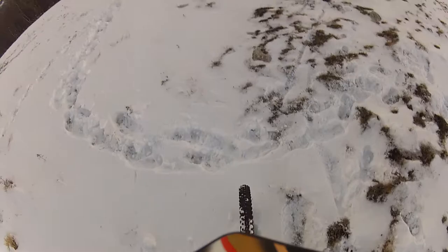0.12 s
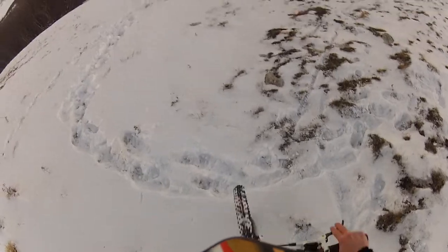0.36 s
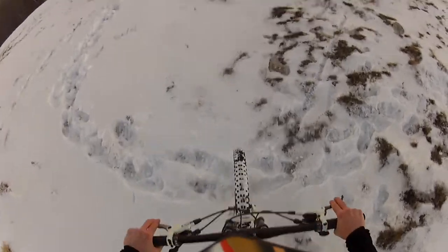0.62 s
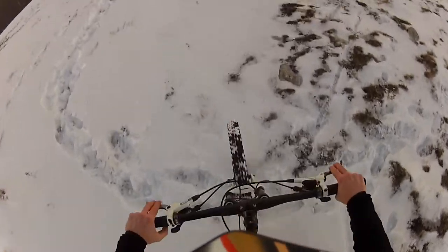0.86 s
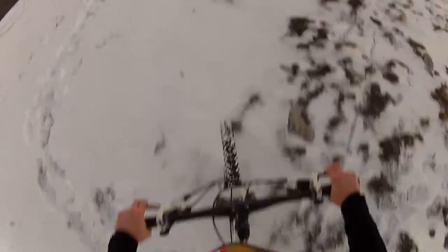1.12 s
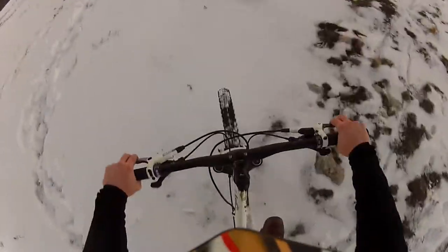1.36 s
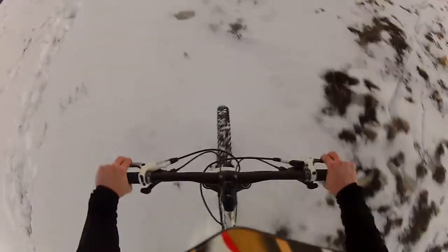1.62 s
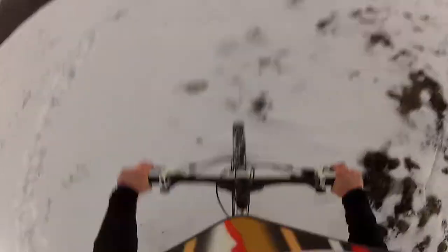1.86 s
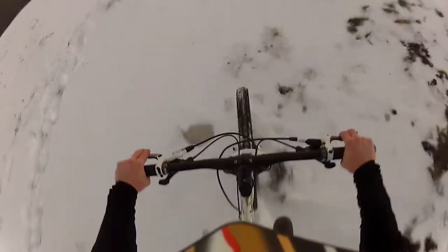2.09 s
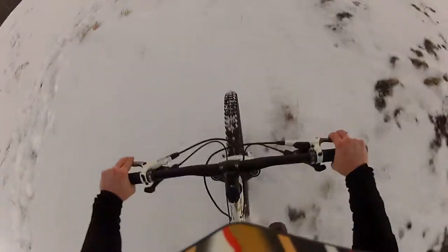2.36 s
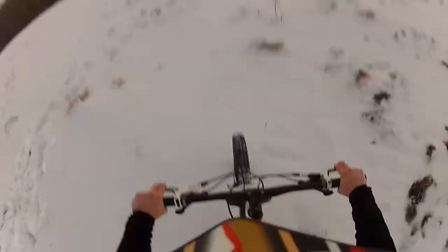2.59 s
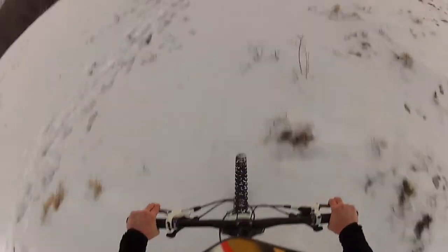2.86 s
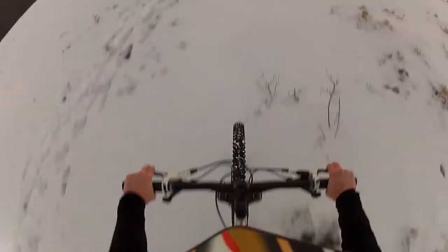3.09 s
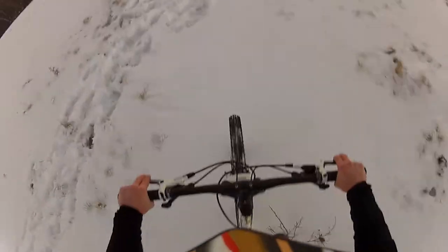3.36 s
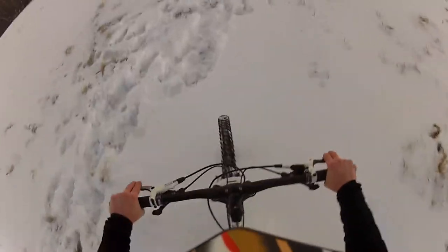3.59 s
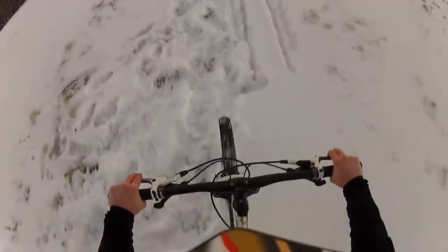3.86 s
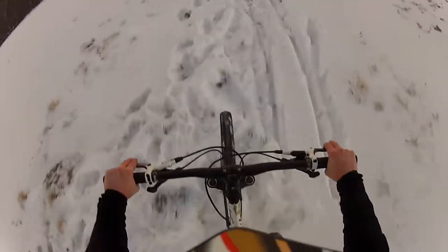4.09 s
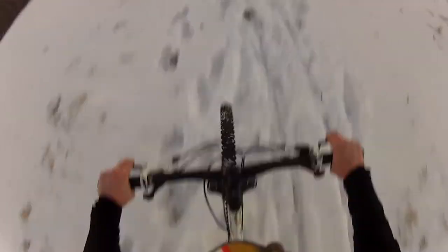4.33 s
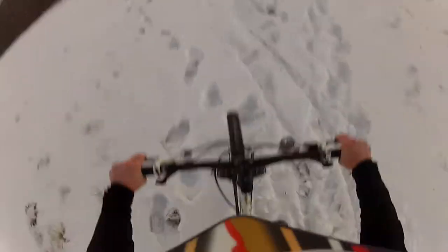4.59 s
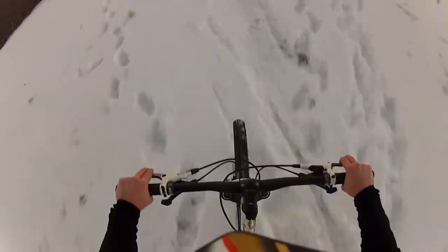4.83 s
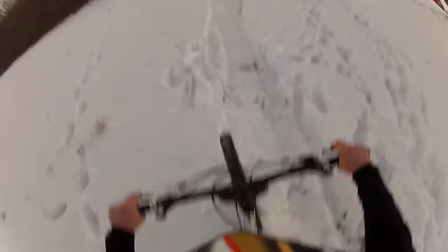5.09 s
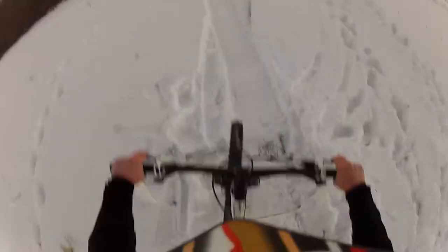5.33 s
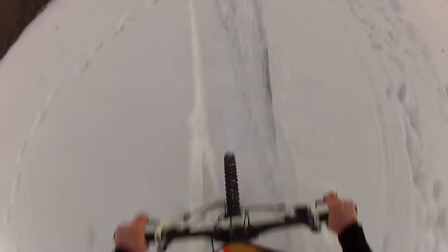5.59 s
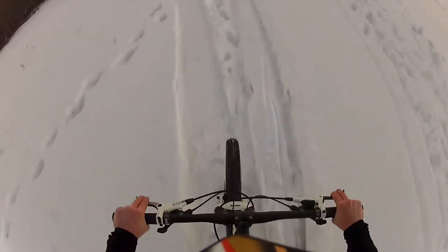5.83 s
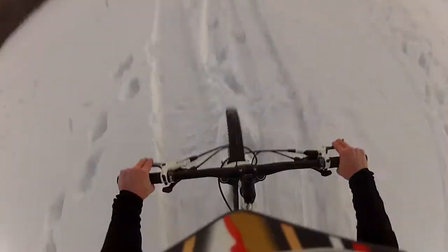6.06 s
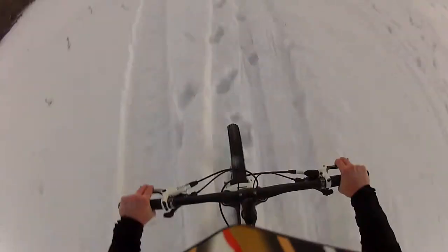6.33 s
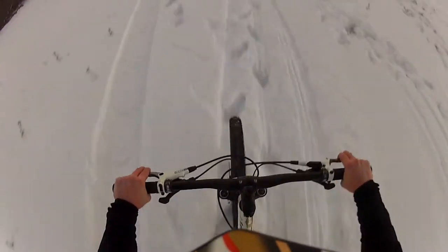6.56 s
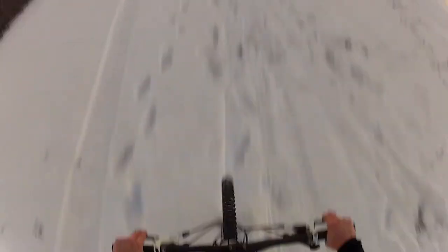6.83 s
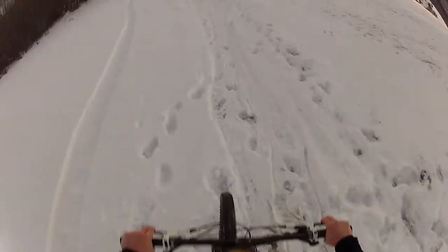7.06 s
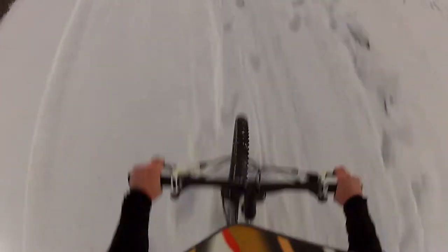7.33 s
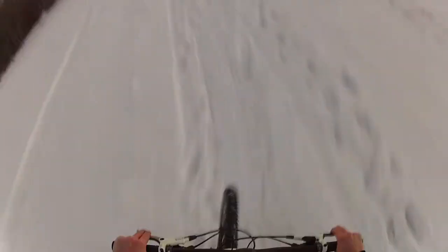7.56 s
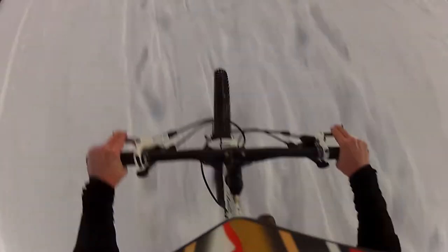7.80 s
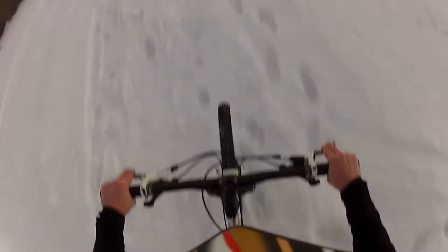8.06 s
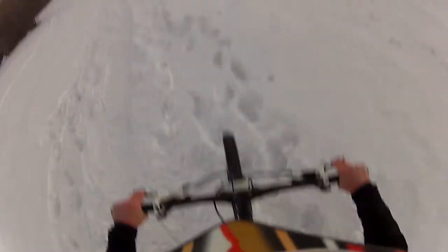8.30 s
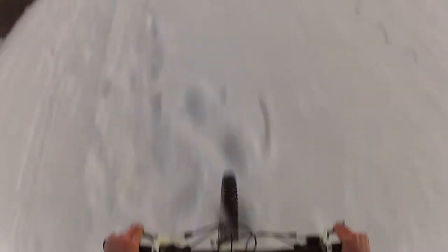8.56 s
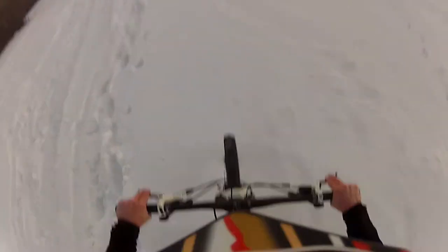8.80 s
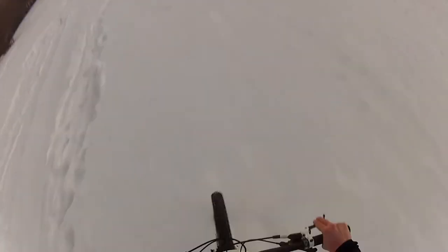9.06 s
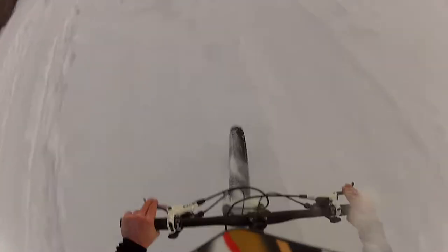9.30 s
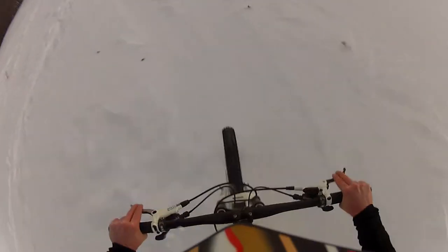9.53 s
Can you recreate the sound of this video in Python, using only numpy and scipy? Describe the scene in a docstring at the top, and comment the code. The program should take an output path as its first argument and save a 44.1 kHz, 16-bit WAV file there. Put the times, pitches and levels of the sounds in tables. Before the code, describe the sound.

A bike and its cased camera jolt down a bumpy snow slope, faint taps and hiss growing into hard plastic knocks and low thumps.

```python
"""Faint hiss, buzzing and a dull tap come first; then ever stronger knocks and thumps join in.
A small camera in a hard plastic case rides on a cyclist jolting down a bumpy snow slope.
Blows make the case, panels, clip and latch ring at their own tones; each jolt swings the diaphragm.
Shaped noise makes the low rumble, tyre hiss and snow scuff beneath; tiny touches make a fine rattle.
The camera holds each sample a twelve-thousandth of a second, which mirrors the sound into the treble."""
import sys
import numpy as np
from scipy import signal
from scipy.fft import rfft, irfft
from scipy.io import wavfile
from scipy.ndimage import uniform_filter1d

SR = 44100
rng = np.random.default_rng(int(sys.argv[2]) if len(sys.argv) > 2 else 0)


def to_linear_factor(level_db):
    """Convert decibel levels (scalar or array-like) to linear amplitude factors."""
    exponent = np.asarray(level_db, float) / 20
    return 10 ** exponent


def unload_audio(sound):
    """Save the sound as a 16-bit wav file, at the path given as the first command line argument."""
    columns = np.transpose(np.atleast_2d(sound))
    # keep every value between -1 and 1, then stretch to whole-number steps
    steps = np.round(np.clip(columns, -1, 1) * 32767)
    wavfile.write(sys.argv[1], SR, steps.astype(np.int16))


N = 426447
T = np.arange(N) / SR  # time of every sample [s]

# Event levels are peaks before soft clipping.
# the camera hits its case: (time [s], peak [dB])
CASE_KNOCKS = [(1.21, -19), (1.236, -36), (1.275, -27), (1.532, -29), (1.799, -31), (1.812, -26),
               (1.836, -23.5), (1.869, -15), (1.951, -33), (2.289, -36), (2.531, -15), (2.538, -18),
               (2.98, -26.5), (3.005, -24), (3.044, -8.5), (3.21, 4.5), (3.849, -24.5), (4.246, -18.5),
               (4.259, -3.5), (4.441, -29.5), (4.449, -23), (4.483, -34), (4.462, -24), (4.473, -22),
               (4.497, -13), (4.51, 9.5), (4.664, -23.5), (4.766, -23), (5.009, -19), (5.029, -24),
               (5.176, -10.5), (5.187, -10.5), (5.404, -19.5), (5.46, -21.5), (5.738, -16), (5.948, -30.5),
               (6.264, 1), (7.101, -31), (6.905, 0), (7.173, -23.5), (7.238, 7), (7.293, -21),
               (7.305, -9.5), (7.447, 2.5), (7.633, 5), (7.478, -34), (7.687, -20.5), (7.711, -26),
               (7.748, 2), (7.825, -16), (8.029, -26), (8.093, -16.5), (8.316, -7.5), (8.378, -23),
               (8.491, 1.5), (8.643, 2), (8.783, -14), (8.869, -25), (9.127, -27), (9.193, -8.5),
               (9.294, -26), (9.423, -25)]
# (time [s], blow peak [dB], tick lead [s], tick peak [dB], thump peak [dB])
SEAT_DROPS = [(1.265, -21, .013, -18, -19), (1.585, -26.5, 0.02, -30.5, -26.5),
              (1.921, -11.5, 0.012, -45, -16), (2.023, -28.5, 0.01, -42, -18.5),
              (2.325, -25.5, .013, -23.5, -22.5), (2.651, -13.5, 0.013, -36, -19.5),
              (3.027, -21.5, .013, -13.5, -17), (3.266, -17, 0.014, -10, -15),
              (4.304, -12.5, .01, -9.5, -23.5), (4.549, -12, 0.016, -35, -18.5),
              (5.074, -16, 0.013, -21.5, -15.5), (5.531, -30, .031, -25, -38),
              (5.756, -21.5, 0.029, -23.5, -22), (6.112, -8, 0.012, -10, -13.5),
              (6.335, -12.5, 0.018, -25.5, -17.5), (6.773, -22, 0.029, -28, -25),
              (6.972, -16, .013, -40, -23), (7.283, -13, 0.01, -37, -9), (7.53, -8.5, .013, -38, -6),
              (7.678, -23, .013, -28, -11.5), (7.812, -10, .013, -41, -10),
              (8.085, -10.5, .014, -15, -18.5), (8.368, -10.5, .014, -15, -16),
              (8.543, -9.5, 0.0069, -12.5, -11), (8.695, -4, .018, -22, -13),
              (8.859, -10, 0.024, -26, -17.5), (9.181, -14.5, 0.012, -13, -9.5),
              (9.324, -14, .023, -18, -20)]
# duller blows on a panel: (time [s], peak [dB], panel tone [Hz])
PANEL_TAPS = [(0.364, -24.5, 1127), (0.53, -39, 1150), (0.683, -40, 1050), (0.767, -35, 940),
              (0.974, -25, 1110), (1.184, -21.5, 726), (1.198, -22, 900), (1.45, -31.5, 1100),
              (1.512, -26.5, 840), (1.728, -22.5, 1075), (2.068, -24.5, 1080), (2.483, -30.5, 1070),
              (2.775, -20, 1054), (3.169, -29.5, 1130), (3.772, -26.5, 895), (3.839, -25, 840),
              (4.076, -33, 1020), (4.377, -27, 1160), (4.619, -24, 920), (4.709, -19, 1070),
              (4.787, -24.5, 1070), (4.923, -27.5, 790), (4.978, -28, 1040), (5.105, -23, 1070),
              (5.652, -24.5, 1040), (5.786, -30.5, 1070), (6.027, -24, 915), (6.219, -20, 1040),
              (6.383, -29, 830), (6.474, -18, 1065), (6.665, -29.5, 1000), (7.544, -16, 1070),
              (7.925, -24, 894), (8.556, -20, 890)]
# further clip ticks: (time [s], peak [dB])
CLIP_TICKS = [(4.517, -7), (4.473, -17.5), (7.151, -27), (7.28, -12.5), (7.665, -25), (7.83, -22.5),
              (9.531, -20.5)]
# a loose latch buzzes: (time [s], peak [dB])
LATCH_BUZZES = [(0.069, -54), (0.401, -45.5), (0.455, -54), (0.482, -52), (0.76, -48), (1.21, -29.5),
                (1.265, -39), (1.53, -40.5), (1.582, -37), (1.778, -37.5), (1.868, -35), (1.915, -33.5),
                (2.122, -37.5), (2.225, -42), (2.256, -37.5), (2.336, -37), (2.53, -30.5), (2.618, -39.5),
                (2.643, -34.5), (2.885, -41.5), (2.985, -34), (3.359, -34.5), (3.798, -41.5), (3.84, -33.5),
                (4.247, -31), (4.275, -37), (4.497, -38), (4.652, -35.5), (4.822, -40), (4.859, -34),
                (5.01, -26.5), (5.141, -31), (5.459, -32), (5.477, -37), (5.521, -43), (5.695, -40),
                (5.713, -37), (5.738, -42), (5.861, -42), (6.03, -32.5), (6.33, -38), (6.506, -43),
                (6.709, -30.5), (6.774, -43), (7.094, -33), (7.167, -35.5), (7.612, -38), (7.68, -36),
                (7.775, -38), (8.035, -26.5), (8.171, -38.5), (8.313, -29), (8.777, -28.5), (9.017, -35.5),
                (9.127, -30), (9.141, -27.5), (9.266, -31), (9.318, -39), (9.477, -41), (9.538, -41),
                (9.574, -43)]
# further jolts swing the diaphragm out and back: (time [s], peak [dB], swing pace [Hz])
JOLT_SWINGS = [(0.49, -32, 30), (0.553, -32.5, 28.3), (0.796, -25, 35.8), (1.247, -26, 83),
               (1.828, -18.5, 24.1), (1.868, -12.5, 110), (1.899, -28, 63), (2.16, -25, 48.4),
               (2.531, -20, 102), (2.561, -23.5, 45.2), (2.981, -23, 87), (3.384, -26, 27.3),
               (3.869, -15, 45), (4.255, -11, 100), (4.484, -10, 41), (4.566, -12, 130),
               (4.68, -17.5, 33.2), (4.878, -30, 45), (4.958, -25, 45), (5.026, -18.5, 97),
               (5.053, -22, 52), (5.128, -16, 91), (5.159, -20, 29), (5.202, -15.5, 45),
               (5.424, -13.5, 43.4), (5.56, -30, 40), (5.697, -20.5, 89), (6.032, -16, 105),
               (6.207, -22, 38), (6.708, -21.5, 78.4), (7.535, -11.5, 81), (8.062, -15.5, 86),
               (9.048, -26.5, 35), (9.137, -20, 60), (9.163, -19, 105), (9.265, -14, 105), (9.443, -17, 47),
               (9.502, -15, 111)]
# swings after a hard knock: (delay [s], level against the knock's thump [dB], swing pace [Hz])
KNOCK_SWINGS = [(.004, -2, 64.6), (.03, -2.5, 70)]

# Ringing tones of each part; every blow varies their pitch and level a little.
# the case walls: (tone [Hz], time to fade by 60 dB [s], relative level [dB])
CASE_TONES = [(284, 0.031, -5), (726, 0.014, 3.5), (1482, 0.06, 0), (1711, 0.056, -0.5),
              (2224, 0.026, -6.5), (3408, 0.064, -7), (3785, 0.0072, -4.5), (4775, 0.02, -14.5)]
CLIP_TONES = [(3060, 0.016, -11.5), (1760, 0.0037, -6), (4280, 0.0028, -6.5)]
# the latch: (tone [Hz], time to fade by 60 dB [s], relative level [dB])
LATCH_TONES = [(5040, 0.0013, -3), (5140, 0.0083, 16.5), (2520, 0.0088, 11.5)]

# base level of the tyres between the bumps; the layers build on it: (time [s], level [dB])
TYRE_LEVEL = [(0.0, -65.5), (1.78, -60), (1.94, -52), (2.48, -57.5), (3.2, -54.5), (4.12, -60), (4.47, -52),
              (5.84, -53.5), (6.22, -52), (6.49, -56), (7.59, -49.5), (8.11, -48.5), (8.7, -50),
              (8.92, -50.5), (9.4, -46), (9.67, -54.5)]
# tone colour of the low rumble: (frequency [Hz], relative level [dB per Hz])
RUMBLE_COLOUR = [(15, 3.5), (35, 6.5), (60, -7), (100, -15), (240, -25.5), (450, -58.5)]
# tone colour of the gritty tyre hiss: (frequency [Hz], relative level [dB per Hz])
HISS_COLOUR = [(120, -3.5), (260, 11.5), (450, -3), (700, 3.5), (2300, -2.5), (3200, -13.5), (4200, -30),
               (5200, -14.5), (5900, -33)]
# tone colour of snow scuffing in swells: (frequency [Hz], relative level [dB per Hz])
SCUFF_COLOUR = [(1300, -40), (1800, 2.5), (2400, -3.5), (3300, -11), (4500, -41)]

HARD_DB = -10.5  # knocks from this level up throw the camera off its case


def knocks():
    """The camera hits its case; after a hard knock it lands once more, later and weaker."""
    rebound_s, rebound_db = 0.021, -30
    rebounds = [(s + rebound_s, db + rebound_db) for s, db in CASE_KNOCKS if db >= HARD_DB]

    def body(row, chance):
        return ring(case(row[1]), chance, 0.003)

    return clatter(CASE_KNOCKS + rebounds, body, 0.00054, -34.5, -41.5)


def seatings():
    """The camera drops into its seat, whose panel tone varies a little each time."""
    seat_hz, spread = 759, 0.052
    drift = rng.standard_normal(len(SEAT_DROPS))
    rows = [(row[0], row[1], seat_hz * (1 + spread * c)) for row, c in zip(SEAT_DROPS, drift)]
    return clatter(rows, panel, 0.00044, -35.5, -33)


def taps():
    """Dull blows ring a panel; each settles with a weaker, lower tap."""
    late_s, less_db, pitch = 0.009, -13.5, 0.89
    tails = [(s + late_s, db + less_db, hz * pitch) for s, db, hz in PANEL_TAPS]
    return clatter(PANEL_TAPS + tails, panel, 0.0004, -38, -39)


def ticks():
    """The small clip rings very briefly, in its own rows or just before the camera seats."""
    leading = [(s - lead_s, db) for s, _, lead_s, db, _ in SEAT_DROPS]

    def body(row, chance):
        return ring(CLIP_TONES, chance, 0.0026)

    return clatter(CLIP_TICKS + leading, body, 0.0016, -26, -40)


def buzzes():
    """Dense grit makes the loose latch buzz; faint buzzes are scattered at random."""
    faint = []
    for s, lift in rng.random((45, 2)) * (N / SR, 1):
        faint.append((s, rolling(s) + 3.5 + 10 * lift))  # 3.5 to 13.5 dB above the base level

    def body(row, chance):
        return ring(LATCH_TONES, chance, 0.0021)

    return clatter(LATCH_BUZZES + faint, body, 0.0064, -7, -36)


def jolts():
    """The diaphragm swings out, falls quickly through rest and returns more slowly."""
    thump_db, thump_per_db = -15.5, 1.02  # level at a 0 dB knock; growth with the knock
    seat_delay_s, seat_swing_hz = 0.026, 40.2
    hard = [(s + late_s, thump_db + thump_per_db * db + less_db, hz)
            for s, db in CASE_KNOCKS if db >= HARD_DB
            for late_s, less_db, hz in KNOCK_SWINGS]
    seats = [(row[0] + seat_delay_s, row[4], seat_swing_hz) for row in SEAT_DROPS]
    out = np.zeros(N)
    for s, db, hz in JOLT_SWINGS + hard + seats:
        u = (T[:int(3 * SR / hz)] * hz - 1) * 4  # zero as the diaphragm passes rest
        width = np.where(u < 0, 1.1, 1.3)
        swing = -u * np.exp(-0.5 * (u / width) ** 2)
        add(out, s - 1 / hz, swing, db)
    return out


def rattles(rough_db):
    """Tiny touches land all over the case, each waking mostly one of its tones."""
    rattle = np.zeros(N)
    for tone in case(-15):
        touches = sparks(60, 3.44)
        rattle += signal.fftconvolve(touches, ring([tone], np.zeros(20), 0.0018))[:N]
    return to_linear_factor(1.065 * rough_db + 10) * rattle


def tyre_hiss(rough_db):
    """Tyre noise turns gritty as hundreds of tiny grains a second burst in it."""
    grains = sparks(800, 3)
    hiss = colour(rng.standard_normal(N) + 1.55 * grains, HISS_COLOUR)
    return hiss * to_linear_factor(rough_db + 4 + 2 * walk(89))


def snow_scuff(rough_db):
    """Snow rubs by in slow and quick swells of noise."""
    swells_db = 4 * walk(12) + 2 * walk(60)
    return colour(rng.standard_normal(N), SCUFF_COLOUR) * to_linear_factor(rough_db - 6 + swells_db)


def rumble(rough_db, shaking):
    """Low noise grows with rough snow and with the shaking of the jolts."""
    level = to_linear_factor(1.062 * rough_db + 22 + 4.96 * walk(16)) + 0.45 * shaking
    return colour(rng.standard_normal(N), RUMBLE_COLOUR) * level


def roughness(heavy):
    """Snow level in dB: rolling, plus a crunch on every bump that also throws the camera about."""
    crunch_db, growth, spread_s = -26.5, 0.38, 0.045
    k = int(spread_s * SR)
    bumps = uniform_filter1d(uniform_filter1d(np.abs(heavy) ** growth, k), k)
    steady = to_linear_factor(rolling(T) - 4 + 2.6 * walk(9))
    return 20 * np.log10(steady + to_linear_factor(crunch_db) * np.abs(bumps))


def rolling(t):
    """Base tyre level in dB, joined by straight lines between the table's points."""
    return np.interp(t, *np.transpose(TYRE_LEVEL))


def case(db):
    """Hard blows reach the deep wall tones and the bright ones; soft blows keep to the middle."""
    return [(hz, t60, level + (0 if 1000 < hz < 3000 else 0.2 * db)) for hz, t60, level in CASE_TONES]


def panel(row, chance):
    """Stiffer panels ring longer; harder blows also wake the rest of the case."""
    s, db, hz = row
    tones = [(hz, 0.03, 0), (0.724 * hz, 0.03, -8), (2.046 * hz, 0.02, -12), (3.1 * hz, 0.02, -18)]
    own = ring(tones, chance, 0.0061 * (hz / 1000) ** 2)
    return own + to_linear_factor(0.35 * db) * ring(case(db), chance[20:], 0.0038)


def ring(tones, chance, free_s):
    """Fading tones with a soft start, choked after free_s as the parts touch again."""
    rise_s, detune, level_spread_db = 0.00036, 0.012, 2.52
    t = T[:1000]
    y = np.zeros(len(t))
    for (hz, t60, db), louder, sharper in zip(tones, chance[:10], chance[10:20]):
        wave = np.sin(2 * np.pi * hz * (1 + detune * sharper) * t)
        fade = np.exp(-np.log(1000) * t / t60)
        y += to_linear_factor(db + level_spread_db * louder) * wave * fade
    soft_start = 1 - np.exp(-(t / rise_s) ** 2)
    return y * soft_start / (1 + (t / free_s) ** 6)


def clatter(rows, body, grit_s, grit_db, scrape_db):
    """Strike one kind of part at every row (time [s], peak [dB], ..); body gives its ring."""
    out = np.zeros(N)
    for row, chance in zip(rows, rng.standard_normal((len(rows), 1300))):
        strike(out, row[0], row[1], body(row, chance), chance[40:], grit_s, grit_db, scrape_db)
    return out


def strike(out, s, db, body, chance, grit_s, grit_db, scrape_db):
    """One firm push, grit spread around it, and a faint scrape that leads in and trails off."""
    lead_s = 0.012
    t = T[:len(chance)] - lead_s
    grit = to_linear_factor(grit_db) * np.exp(-(t / grit_s) ** 4)
    scrape = to_linear_factor(scrape_db) * np.where(t < 0, 0.3, 1) * np.exp(-np.abs(t) / 0.0035)
    push = np.arange(len(t)) == int(lead_s * SR)
    force = chance * np.abs(chance) * (grit + scrape) + push
    add(out, s - lead_s - 0.0012, np.convolve(body, force), db)


def add(out, s, sound, db):
    """Mix a sound in, starting at time s, with peak level db."""
    i = min(max(int(s * SR), 0), N - 1)
    out[i:i + len(sound)] += (sound * to_linear_factor(db) / np.abs(sound).max())[:N - i]


def sparks(per_second, spread_db):
    """Single-sample impulses at random times, now and then much stronger."""
    present = rng.random(N) < per_second / SR
    return present * to_linear_factor(spread_db * rng.exponential(size=N)) * rng.standard_normal(N)


def colour(x, points):
    """Filter a sound by (frequency [Hz], level [dB]) points and bring its rms to 1."""
    hz, db = np.transpose(points)
    f = np.arange(N // 2 + 1) * SR / N + 1
    y = irfft(rfft(x) * to_linear_factor(np.interp(np.log(f), np.log(hz), db)), N)
    return y / np.std(y)


def walk(rate):
    """Random levels held 1 / rate s and smoothed twice; spread near 1."""
    k = int(SR / rate)
    steps = np.repeat(rng.standard_normal(N // k + 1), k)
    return 1.3 * uniform_filter1d(uniform_filter1d(steps, k), k)[:N]


def scene():
    """All sources reach the one microphone through the case."""
    heavy = knocks() + seatings()
    light = taps() + ticks() + buzzes()
    thumps = jolts()
    shaking = uniform_filter1d(np.abs(thumps), int(0.011 * SR))
    rough_db = roughness(heavy)
    ride = rumble(rough_db, shaking) + tyre_hiss(rough_db) + snow_scuff(rough_db) + rattles(rough_db)
    return (heavy + light + thumps + ride)[None]


def low_pass(x):
    """Removes everything above the highest recorded frequency."""
    return signal.sosfilt(signal.butter(12, 16370, fs=SR, output="sos"), x)


def record(dry):
    """Microphone hiss; peaks clip softly; samples are held four ticks of a faster clock; the top is cut."""
    mic_hiss_db, ceiling, top_hz = -69, 0.92, 15050
    x = dry + to_linear_factor(mic_hiss_db) * rng.standard_normal(dry.shape)
    clipped = ceiling * np.tanh(x / ceiling)
    slow = signal.resample_poly(clipped, 40, 147, axis=1)  # 12 kHz
    held = np.repeat(slow, 4, axis=1)  # 48 kHz; the steps mirror the sound above 6 kHz
    x = signal.resample_poly(held, 147, 160, axis=1)[:, :N]  # back to SR
    x = np.pad(x, ((0, 0), (0, N - x.shape[1])))
    mix = signal.sosfilt(signal.cheby1(8, 0.5, top_hz, fs=SR, output="sos"), x)
    return low_pass(mix)


dry = scene()
out = record(dry)
unload_audio(out)
```